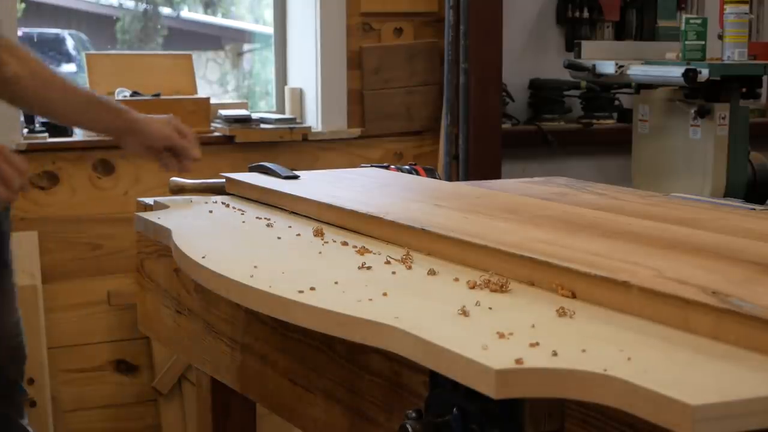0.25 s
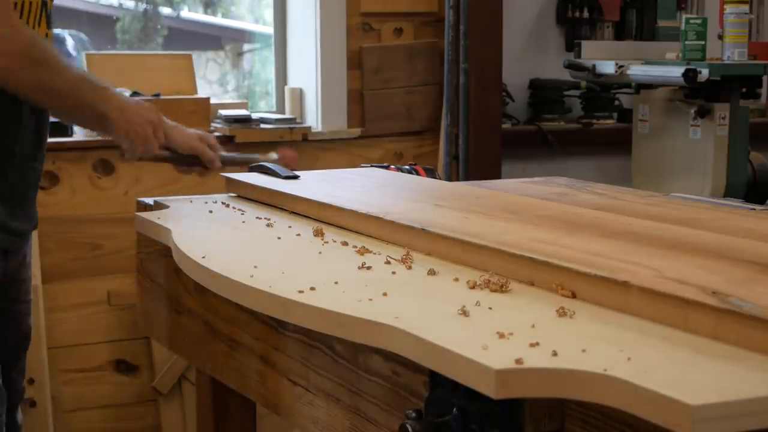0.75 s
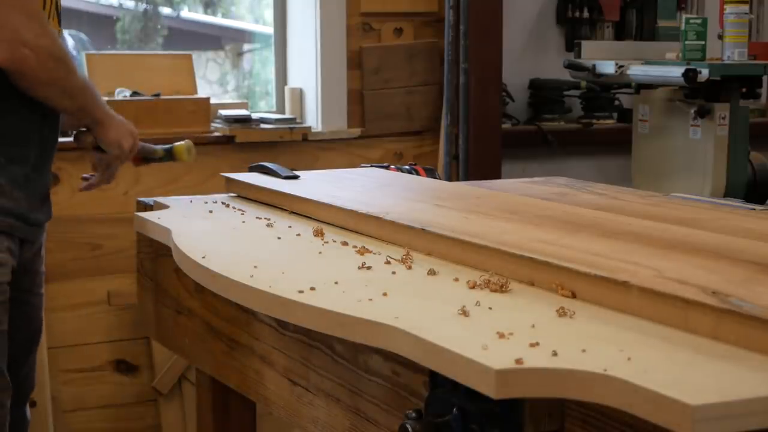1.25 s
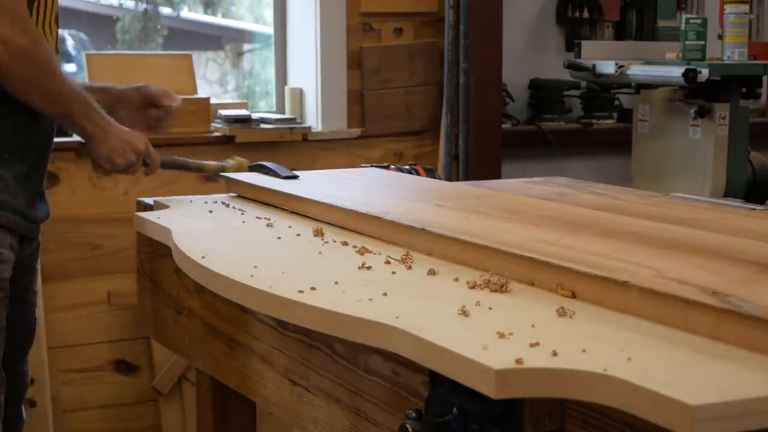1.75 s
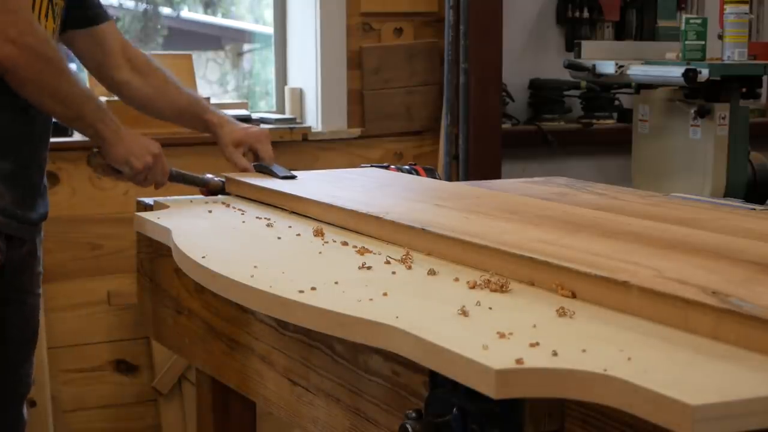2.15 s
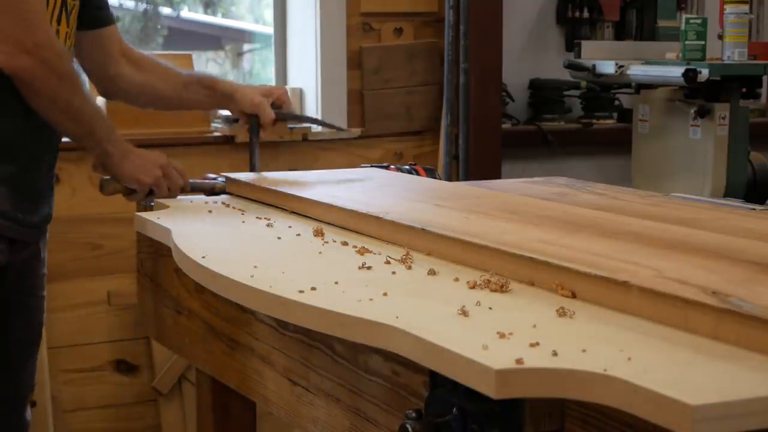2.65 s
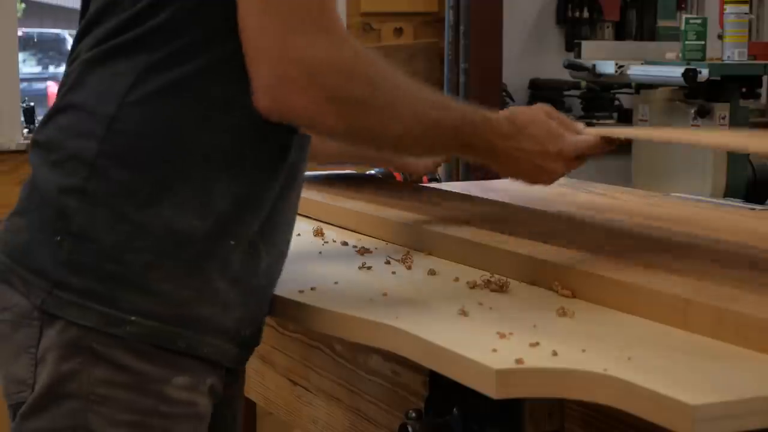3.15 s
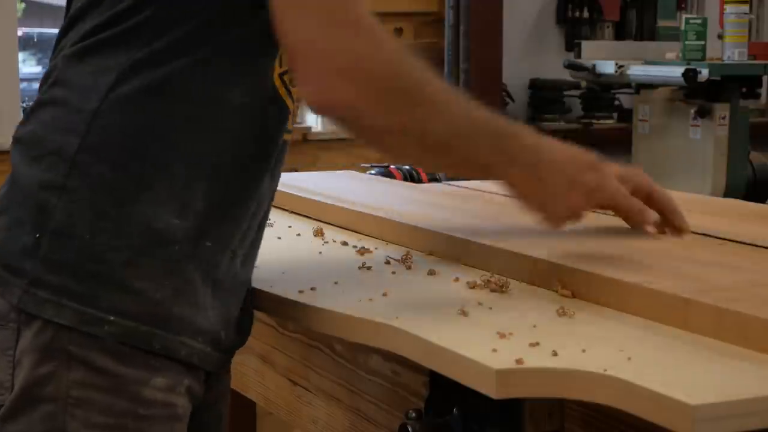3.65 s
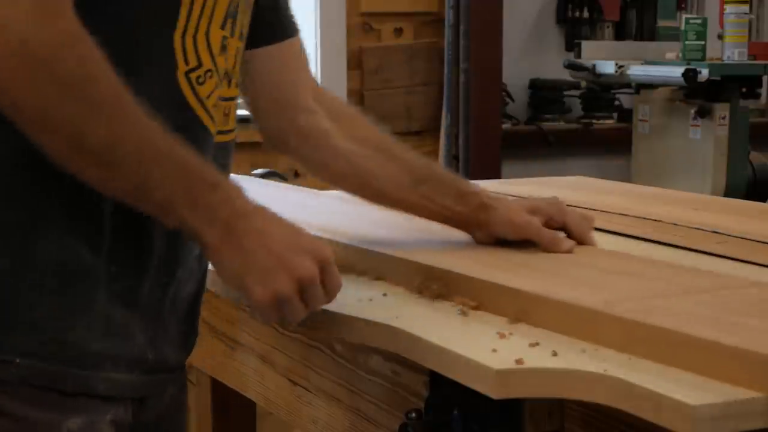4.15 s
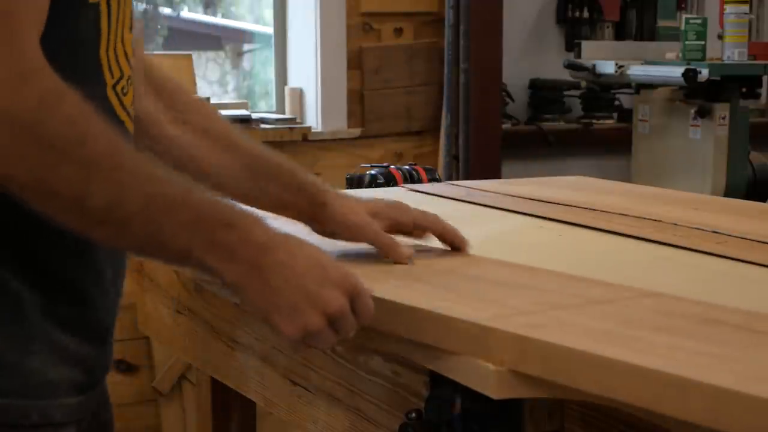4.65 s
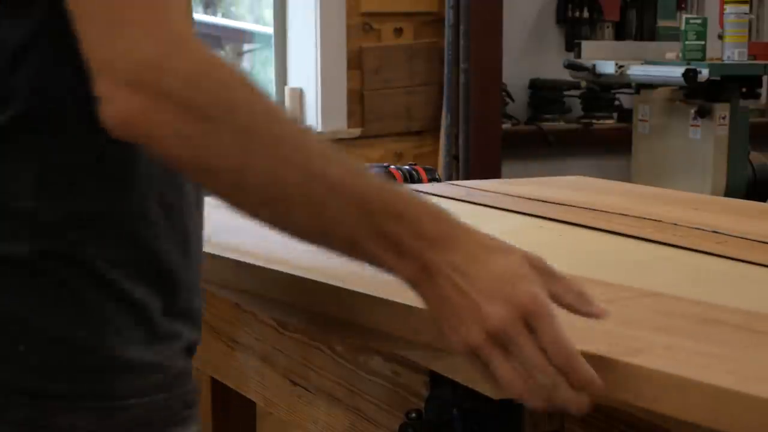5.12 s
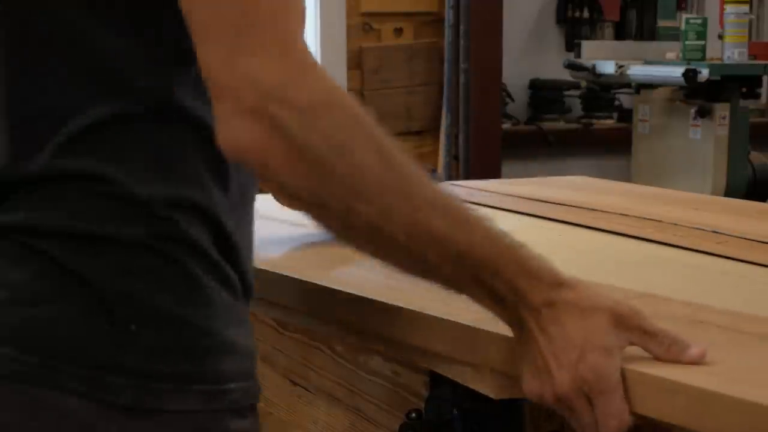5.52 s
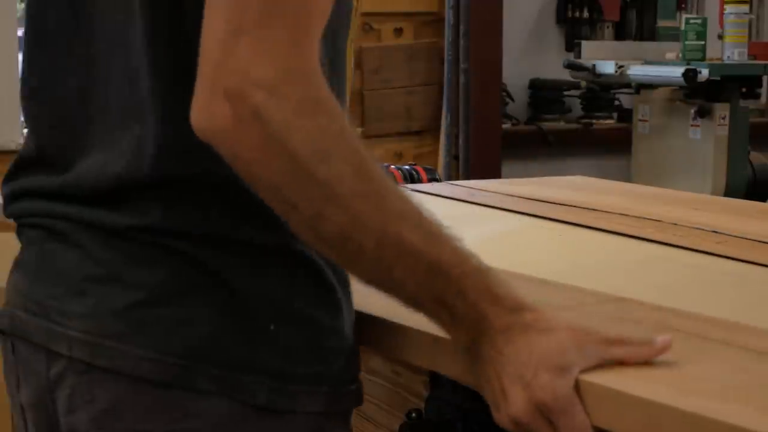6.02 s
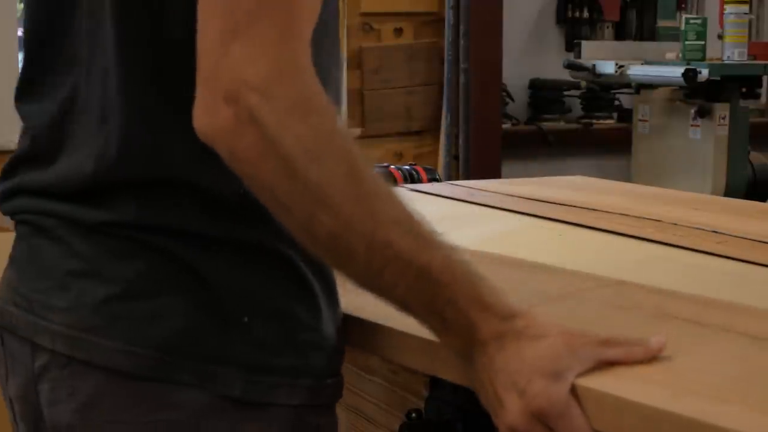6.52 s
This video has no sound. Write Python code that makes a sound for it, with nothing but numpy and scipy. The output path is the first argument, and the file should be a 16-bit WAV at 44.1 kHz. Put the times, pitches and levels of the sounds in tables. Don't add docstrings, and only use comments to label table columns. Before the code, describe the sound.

Close microphone at a wooden bench in a small dry-sounding shop with low air noise. Light cloth and hand movement comes first, then two hard mallet blows crack against a steel clamp and wood. Lower thuds follow, with quiet clamp handling. A strip lands in a sharp rattling double clatter, a plank grinds softly over the bench, and hands rub and crush crisp shavings before things fall nearly silent with faint ticks.

```python
import sys
import numpy as np
from scipy import signal
from scipy.fft import rfft, irfft
from scipy.io import wavfile
from scipy.ndimage import uniform_filter1d

SR = 44100
rng = np.random.default_rng(int(sys.argv[2]) if len(sys.argv) > 2 else 0)


def field_ratio(decibels):
    return 10 ** (np.asarray(decibels, dtype=float) / 20)


def transcribe(u):
    v = np.clip(np.atleast_2d(u).T, -1, 1)
    q = np.round(v * 32767).astype(np.int16)
    wavfile.write(sys.argv[1], SR, q)


N = 299030

# (f/Hz, level/dB, time to fall 60 dB/s)
BENCH = [(172.7, -10, 0.37), (281.7, 1.5, 0.13), (434, -2, 0.16), (549.5, -2.5, 0.15), (720, -1, 0.2),
         (907, -6.5, 0.17), (964, -8.5, 0.063), (1095, -16, .2), (1226, -16, 0.52), (1397, -15, .15),
         (1530, -22, 0.29), (1927, -21, 0.051), (2190, -16.5, .12), (2560, -21, 0.13)]
# (f/Hz, level/dB)
SCRAPE = [(1060, -23.5), (1800, -9), (2130, -4.5), (2310, -2), (2670, 4), (3290, -6.5), (4200, -16),
          (5460, -40.5), (9240, -120)]
# (f/Hz, level/dB)
DRAG = [(410, -35), (700, -6.5), (898, -2.5), (970, -2.5), (1360, -3), (1490, -1.5), (1650, -3.5),
        (2200, -2.5), (2860, -16.5), (4840, -120)]
# (f/Hz, level/dB)
SHAVINGS = [(1940, -28.5), (3300, 1), (4120, 3), (5490, 3), (6650, -0.5), (8250, -1.5), (10500, -7.5),
            (11000, -7), (14300, -41), (22000, -120)]


def evened(x):
    return x / np.sqrt(np.mean(x ** 2) + 1e-20)


def read(points, hz):
    f, value = np.transpose(points)
    return np.interp(np.log(hz + 1), np.log(f + 1), value)


def add(mix, s, sound):
    part = mix[round(s * SR):][:len(sound)]
    part += sound[:len(part)]


def add_all(mix, table, source):
    for s, *row in table:
        add(mix, s, source(*row))


def sine(hz, t):
    return np.sin(2 * np.pi * hz * t)


def coloured(x, points):
    gain = field_ratio(read(points, np.fft.rfftfreq(len(x), 1 / SR)))
    return evened(irfft(rfft(x) * gain, len(x)))


def noise(points, size):
    return coloured(rng.standard_normal(size), points)


def wobble(width):
    x = uniform_filter1d(rng.standard_normal(N), size=width)
    return evened(uniform_filter1d(x, size=width))


def hump(hz, octaves, skirt_db):
    return [(hz * 2. ** (k * octaves), skirt_db * k ** 2) for k in range(-3, 4)]


def dying(points, t60s, seconds):
    size = int(seconds * SR)
    hz, t, z = signal.stft(noise(points, size), SR, nperseg=512)
    fall = field_ratio(-60 * t / read(t60s, hz)[:, None])
    return signal.istft(z * fall, SR, nperseg=512)[1][:size]


def falling(t60, tail_db, tail_t60):
    t = np.arange(int(.5 * SR)) / SR
    return t, field_ratio(-60 * t / t60) + field_ratio(tail_db - 60 * t / tail_t60)


def thump_of_blow(t):
    first_hz, last_hz, glide_s, top_s = 832, 370, .005, .0064
    hz = last_hz + (first_hz - last_hz) * np.exp(-(t / glide_s) ** 2)
    turns = np.cumsum(hz) / SR
    swell = .45 * np.minimum(t / .003, 1) * np.exp(-(t / .0115) ** 4)
    swell += .75 * np.exp(-((t - top_s) / .0016) ** 2)
    return -swell * np.cos(2 * np.pi * turns)


def crack_of_blow(t, crack_s):
    u = np.maximum(t - crack_s, 0)
    crack = sum(gain * sine(hz, u) for gain, hz in
                [(0.24, 3800), (0.44, 5900), (1, 4900), (0.27, 6700), (0.59, 2900)])
    crack = crack * np.exp(-u / 0.00037) * (1 - np.exp(-u / .00008))
    snap = 0.09 * np.exp(-u / 0.00012) * sine(11000, u)
    slap = .9 * sine(1480, t) + 1.5 * sine(1100, t) + 0.39 * sine(3700, t)
    slap = slap * (t / 0.0038) ** 2 * np.exp(-2 * t / 0.0027)
    chirp_turns = 3200 * u - 220000 * u ** 2
    chirp = 0.23 * u / 0.00098 * np.exp(1 - u / .0009) * sine(1, chirp_turns)
    crack = signal.lfilter(*signal.butter(6, 7800, fs=SR), crack)
    return crack + 1.1 * np.roll(slap, 55) + field_ratio(-3) * chirp + snap


def steel_of_blow(k, t):
    steel_hz = [5257, 7413, 8850, 9652, 10630, 11100, 12118, 12620, 13214, 14260]
    # (level at first blow/dB, level at second blow/dB, time to fall 60 dB/s)
    steel_rows = [(-50, -50, .3), (-43, -49, .5), (-58, -60, .2), (-62, -58, .5), (-60, -59, .3),
                  (-60, -60, .2), (-62, -60, .2), (-64, -60, .35), (-63, -62, .2), (-66, -61, .3)]
    return sum(field_ratio(row[k] - 60 * t / row[2]) * sine(hz, t) for hz, row in zip(steel_hz, steel_rows))


def tail_of_blow(k, t):
    # (f/Hz, level/dB)
    tail_colours = [
        [(35, -37.5), (60, -18.5), (148, -13.5), (240, -5.5), (539, -14.5), (727, -2), (816, -9.5),
         (1080, -6.5), (1670, -14), (2360, -19), (2590, -12.5), (3340, -25.5), (7600, -24.5), (8300, -39.5),
         (15000, -53)],
        [(35, -52.5), (60, -16.5), (151, -17), (257, -4.5), (364, -10.5), (648, -13.5), (727, -0.5),
         (816, -15.5), (1050, -8.5), (1790, -21), (2840, -22.5), (3580, -33), (7500, -36.5), (8300, -48.5),
         (15000, -67)],
    ]
    # (f/Hz, time to fall 60 dB/s)
    shop_t60 = [(60, 0.94), (250, 0.78), (600, 0.44), (1500, 0.36), (4000, 0.72), (8000, 0.58),
                (15000, 0.93)]
    early_t60 = [(60, 0.13), (500, 0.11), (3000, 0.076), (15000, 0.026)]
    bench = sum(field_ratio(db - 60 * t / t60) * sine(1, hz * t + rng.random()) for hz, db, t60 in BENCH)
    early = dying(tail_colours[k], early_t60, .8)
    return dying(tail_colours[k], shop_t60, .8) + field_ratio(10) * early + field_ratio(1) * bench


def blow(k, crack_s, thump_db, crack_db, tail_db):
    t = np.arange(int(.8 * SR)) / SR
    rise = 1 - np.exp(-(t / .007) ** 2)
    ringing = field_ratio(tail_db) * tail_of_blow(k, t) + steel_of_blow(k, t)
    return field_ratio(thump_db) * thump_of_blow(t) + field_ratio(crack_db) * crack_of_blow(t, crack_s) + rise * ringing


def add_blows(mix):
    # (t/s of the blow, t/s until the steel cracks)
    blow_times = [
        (1.4813, .0030),
        (1.8289, .0030),
    ]
    # (thump level/dB, crack level/dB, tail level/dB)
    blow_levels = [
        (-4, 0.5, -24.5),
        (-4, 0, -22),
    ]
    for k, (s, crack_s) in enumerate(blow_times):
        add(mix, s, blow(k, crack_s, *blow_levels[k]))


def thud(peak_db, body_hz, click_db, t60, rise_s=0.0012):
    t, fall = falling(t60, -16.5, 0.39)
    near = hump(body_hz, .75, -7)
    wood = sum(field_ratio(db + read(near, hz)) * sine(hz, t) for hz, db, _ in BENCH)
    wood = evened(evened(wood) + .7 * noise(near, len(t)))
    click = noise(DRAG, len(t)) + noise(SCRAPE, len(t))
    return field_ratio(peak_db - 8) * fall * (1 - np.exp(-t / rise_s)) * (wood + field_ratio(click_db) * click)


def bump(peak_db, body_hz, t60):
    return thud(peak_db, body_hz, -58, t60, rise_s=0.0062)


def rock(peak_db):
    return thud(peak_db, body_hz=550, click_db=-11, t60=0.1, rise_s=0.0028)


def add_thuds(mix):
    # (t/s, peak level/dB, body f/Hz, click against body level/dB, time to fall 60 dB/s)
    thud_rows = [(0.588, -42, 649, -7.5, 0.046), (0.622, -38, 358, -37, 0.11),
                 (1.914, -20.5, 397, -16, 0.24), (2.072, -15, 320, -26, 0.12),
                 (2.104, -20, 536, -24.5, 0.085), (2.703, -33, 360, -39, 0.086),
                 (2.63, -37, 450, -25, 0.025), (2.827, -52, 450, 4.5, 0.05),
                 (3.654, -22.5, 490, -1.5, 0.081), (3.972, -36, 315, -5.5, 0.24),
                 (4.471, -31, 600, -26, 0.16), (4.5, -34, 400, -16, 0.11), (.645, -36.5, 500, -26, 0.05),
                 (5.22, -65, 313, -3, 0.08)]
    # (t/s, peak level/dB)
    rock_rows = [
        (2.263, -42.5),
        (2.377, -43),
        (2.488, -43.5),
        (2.599, -43.5),
    ]
    # (t/s, peak level/dB, body f/Hz, time to fall 60 dB/s)
    bump_rows = [(.62, -31, 222, 0.12), (2.128, -27, 203, 0.13), (3.661, -36, 100, 0.11),
                 (3.965, -40.5, 102, .3), (5.46, -56, 90, 0.36), (5.779, -52, 131, 0.32)]
    add_all(mix, thud_rows, thud)
    add_all(mix, rock_rows, rock)
    add_all(mix, bump_rows, bump)


def tick(peak_db, click_db, rattle_db, rattle_hz):
    t, fall = falling(0.0033 + 2.6e-6 * rattle_hz, -15.5, 0.35)
    size = len(t)
    click = 0.68 * noise(DRAG, size) + noise(SCRAPE, size) + 0.32 * noise(SHAVINGS, size)
    rattle = 1.2 * np.exp(-t / .006) * noise(hump(rattle_hz, 0.12, -9.5), size)
    rattle += .6 * noise(hump(rattle_hz, .6, -6.5), size)
    both = field_ratio(click_db) * click + field_ratio(rattle_db) * rattle
    return field_ratio(peak_db + 2) * fall * (1 - np.exp(-t / 0.00069)) * both


def add_ticks(mix):
    # (t/s, peak level/dB, click against peak level/dB, rattle against peak level/dB, rattle f/Hz)
    tick_rows = [(2.9535, -37, -4.5, -28, 5260), (3.1074, -39.5, -5.5, -36, 5500),
                 (3.1384, -42, -28, -12.5, 11390), (3.5164, -21, -15, -9, 11600),
                 (3.5298, -17.5, -18.5, -7.5, 11480), (3.5452, -23, -15, -7, 11210),
                 (3.6500, -18.5, -13, -15.5, 12900), (3.6647, -13, -20, -13, 10160),
                 (4.6698, -44, -18, -15, 10750), (4.7565, -40, -6.5, -12, 5100),
                 (4.8414, -40, -20.5, -1, 9000), (5.3005, -22, -25, -8, 6700),
                 (5.3614, -37, -12, -16, 5320), (5.3933, -38.5, -16, -8.5, 7370),
                 (6.565, -46.5, -20, -30, 5270), (6.7124, -45.5, -9.5, -31, 5240)]
    add_all(mix, tick_rows, tick)


def ring(modes, peak_db, held_s):
    t = np.arange(int(.3 * SR)) / SR
    tone = sum(field_ratio(db - 60 * t / np.clip(t60, .03, .6)) * sine(hz, t) for hz, db, t60 in modes)
    return field_ratio(peak_db - 600 * np.maximum(t - held_s, 0)) * tone * (1 - np.exp(-t / 0.0013))


def add_rings(mix):
    # (f/Hz, level/dB, time to fall 60 dB/s)
    clamp_tones = [(448, 0, 0.22), (754, 0.5, 0.22), (937, -4.5, 0.5), (2503, -6, 4.6), (3079, -24, 0.47),
                   (3941, -30, 1.7)]
    hole_tones = [(308, -6, 1.3), (468, -1, 0.11)]
    squeak_tones = [(4250, -3, .3)]
    # (t/s, peak level/dB, t/s until a hand stops it)
    ring_rows = [
        (2.8285, -52.5, 0.076),
        (2.703, -41, 0.032),
        (2.655, -70, .07),
    ]
    for modes, (s, *row) in zip([clamp_tones, hole_tones, squeak_tones], ring_rows):
        add(mix, s, ring(modes, *row))


def grit(per_s, spread_db, share):
    snap_db = spread_db * np.minimum(rng.exponential(1, N), 4)
    snaps = (rng.random(N) < per_s / SR) * field_ratio(snap_db) * rng.standard_normal(N)
    flutter_db = .7 * wobble(500) + 1.5 * wobble(90)
    return (rng.standard_normal(N) + share * evened(snaps)) * field_ratio(flutter_db)


def strokes(table, offset_db=0, slope=0):
    t = np.arange(0, N + 64, 64) / SR
    power = 0
    for top, rise, fall, db, colour_db in table:
        away = np.where(t < top, (top - t) / rise, (t - top) / fall)
        power = power + field_ratio(db + offset_db + slope * colour_db - 20 * away ** 1.5) ** 2
    return np.interp(np.arange(N) / SR, t, power)


def pull(offset_db=0, weight=0, caught=0):
    # (t/s, pressure level/dB, weight on the bench level/dB, shavings caught level/dB)
    pull_rows = [(3.86, -66, -1, 1), (3.97, -48.5, 7, -2), (4.12, -40.5, -1, -1), (4.3, -41.5, -4.5, 2.5),
                 (4.45, -45, -4.5, -5.5), (4.5, -41.5, 0, -8.5), (4.57, -46.5, 5, -8.5),
                 (4.69, -58, 2, 5.5), (4.76, -65, -1, 0)]
    s, pressure_db, weight_db, caught_db = np.transpose(pull_rows)
    db = pressure_db + offset_db + weight * weight_db + caught * caught_db
    return field_ratio(np.interp(np.arange(N) / SR, s, db, -200, -200)) ** 2


def dragging():
    # (top t/s, rise t/s, fall t/s, drag level/dB, drone against drag level/dB)
    grind_rows = [(.596, 0.034, 0.05, -59.5, 11.5), (.635, 0.065, 0.13, -70.5, 23),
                  (2.508, 0.1, 0.19, -63, 4), (2.718, 0.027, 0.13, -66.5, 15),
                  (2.835, 0.012, 0.2, -60.5, 6.5), (2.975, 0.056, 0.076, -53.5, -6),
                  (3.111, 0.0081, 0.1, -57.5, 0.5), (3.315, 0.016, 0.049, -70, 5),
                  (3.42, 0.13, 0.081, -69.5, -17), (3.55, 0.029, 0.026, -39.5, -11.5),
                  (3.63, 0.086, 0.028, -50, -2), (3.69, .05, 0.17, -47.5, -1.5),
                  (4.86, 0.19, 0.035, -59, -3.5), (4.98, .07, 0.046, -72.5, -8),
                  (5.226, 0.025, 0.069, -59.5, 1), (5.33, 0.3, 0.27, -59.5, -8),
                  (5.56, .035, .08, -53, -11), (5.63, 0.097, 0.18, -46.5, -10.5),
                  (5.73, 0.1, 0.054, -53.5, -9), (5.8, 0.084, 0.35, -69.5, 5),
                  (6.57, 0.026, 0.092, -55, -8), (6.71, 0.017, 0.071, -56, -14), (6.78, 0.044, .1, -62, 9)]
    # (f/Hz, level/dB)
    drone_colour = [(53, -41), (90, -2.5), (125, -4.5), (334, 2), (416, -3.5), (467, 0.5), (567, -5),
                    (642, -2.5), (900, -16.5), (1170, -16.5), (1980, -120)]
    drag = pull() + strokes(grind_rows)
    drone = pull(-4.5, weight=0.72) + strokes(grind_rows, slope=0.96)
    grinding = np.sqrt(drag) * coloured(grit(900, 4.4, 0.56), DRAG)
    return grinding + np.sqrt(drone) * coloured(grit(300, 5.6, 0.34), drone_colour)


def rubbing():
    # (top t/s, rise t/s, fall t/s, rub level/dB, brightness level/dB)
    swish_rows = [(.055, 0.071, 0.18, -54.5, 3.5), (.18, 0.034, 0.12, -56, 4.5),
                  (.25, 0.042, .08, -55.5, 3), (.286, 0.067, 0.063, -47, -3.5),
                  (.35, 0.073, 0.22, -55.5, -3.5), (.52, 0.052, 0.26, -61, 5), (.77, 0.22, 0.17, -53, 0),
                  (.86, .08, .05, -60.5, -0.5), (1.0, 0.074, 0.18, -75.5, 4), (1.24, 0.2, .2, -65, 0.5),
                  (3.4, 0.075, 0.083, -65, 2), (5.08, 0.71, 0.16, -71, 2), (5.84, 0.19, 0.097, -77.5, 7),
                  (6.354, 0.07, .1, -70, -5)]
    grip_rows = [(2.504, 0.1, 0.153, -68, 2), (2.606, .06, 0.14, -73.5, 0.5), (2.744, 0.027, 0.066, -73, 4),
                 (2.83, 0.047, 0.32, -63.5, -0.5), (2.965, 0.025, 0.15, -49, -5.5),
                 (3.147, 0.043, 0.13, -59, -3.5), (3.55, 0.019, 0.23, -42, 7),
                 (3.68, 0.083, 0.16, -42.5, 7), (3.86, 0.25, .12, -48, 3), (4.75, 0.028, 0.21, -50.5, -5),
                 (4.81, 0.092, 0.092, -52.5, 0.5), (4.85, 0.098, 0.061, -57, 8.5),
                 (6.574, 0.051, 0.12, -61, -6.5), (6.71, 0.049, 0.13, -69, 4.5)]
    sweep_rows = [(5.185, 0.043, 0.11, -54, -6), (5.265, 0.097, 0.14, -45.5, -0.5),
                  (5.225, 0.041, .06, -54.5, 4.5), (5.31, 0.09, 0.056, -48, 7),
                  (5.36, 0.037, 0.045, -45, 6), (5.405, 0.082, 0.13, -40.5, -8), (5.46, .05, .07, -56, -13),
                  (5.64, 0.12, 0.1, -47, -18), (5.715, 0.1, 0.12, -49.5, -17)]
    # (f/Hz, level/dB)
    skin_colour = [(5000, -32.5), (8500, -5.5), (10500, -4), (14500, -8.5), (15300, -15.5), (15800, -23.5),
                   (16200, -25.5)]
    # shavings/dB, skin/dB, skin change per dB of brightness
    kinds = [(swish_rows, -2.5, -10, 2.3), (grip_rows, -5.5, -11.5, 1.4), (sweep_rows, 2, -19, 1.6)]
    rub, shavings, skin = pull(-1.5), pull(-9.5, caught=0.88), pull(-19, caught=2)
    for rows, shavings_db, skin_db, skin_slope in kinds:
        rub += strokes(rows)
        shavings += strokes(rows, shavings_db, 0.99)
        skin += strokes(rows, skin_db, skin_slope)
    sound = np.sqrt(rub) * coloured(grit(1500, 3, .5), SCRAPE)
    sound += np.sqrt(shavings) * coloured(grit(1600, 4.8, 0.23), SHAVINGS)
    return sound + np.sqrt(skin) * coloured(grit(2500, 1.9, 0.32), skin_colour)


def speck(peak_db, hz=6060):
    t = np.arange(300) / SR
    fizz = noise(hump(hz, 1.1, -6), len(t))
    snap = np.exp(-t / .0001) * sine(hz, t)
    return field_ratio(peak_db) * (snap + 0.082 * np.exp(-t / .001) * fizz)


def fleck(peak_db):
    return speck(peak_db, 10300)


def crackle(peak_db):
    return speck(peak_db, 6500)


def add_shavings(mix):
    # (t/s, peak level/dB)
    speck_rows = [(1.1318, -45), (2.2538, -41), (2.5664, -43.5), (2.744, -43), (3.1078, -51),
                  (3.5174, -19.5), (3.6504, -13), (6.694, -45), (5.9602, -41.5), (6.1885, -41),
                  (6.352, -52)]
    fleck_rows = [(5.033, -44), (5.048, -45), (5.081, -53), (5.1018, -41), (5.106, -43), (5.117, -49),
                  (5.757, -47), (5.804, -43)]
    crackle_rows = [(5.1648, -45), (5.1803, -42), (5.207, -37), (5.2235, -34), (5.229, -31), (5.239, -33),
                    (5.271, -33), (5.285, -33), (5.3005, -29), (5.3028, -27), (5.352, -23), (5.357, -31),
                    (5.3625, -32), (5.394, -35), (3.6305, -32), (3.6525, -19)]
    add_all(mix, speck_rows, speck)
    add_all(mix, fleck_rows, fleck)
    add_all(mix, crackle_rows, crackle)


def echoes(x):
    taps = np.zeros(2600)
    taps[rng.integers(60, 2600, 40)] = rng.choice([-1., 1.], 40)
    taps = taps * field_ratio(-60 * np.arange(2600) / SR / 0.082)
    copies = signal.oaconvolve(x, taps / np.linalg.norm(taps))[:N]
    return (x + field_ratio(-10) * copies) * field_ratio(-1.76)


def air():
    # (f/Hz, level/dB)
    air_colour = [(12, -48), (20, -15.5), (124, 2.5), (321, -6.5), (391, -3.5), (489, -7.5), (648, -7.5),
                  (788, -9.5), (1550, -16.5), (2160, -18), (2710, -13.5), (3790, -25.5), (11600, -31.5),
                  (14600, -30.5), (16300, -57)]
    return field_ratio(-64 + 1.1 * wobble(6000)) * noise(air_colour, N)


def scene():
    mid = echoes(rubbing() + dragging())
    add_blows(mid)
    add_thuds(mid)
    add_ticks(mid)
    add_rings(mid)
    add_shavings(mid)
    mid = signal.lfilter(*signal.butter(2, 95, "high", fs=SR), mid) + air()
    return np.array([mid, mid])


def band_limit(x):
    return signal.sosfilt(signal.butter(12, 16970, fs=SR, output="sos"), x)


def record(dry):
    # (f/Hz, side minus mid level/dB)
    quiet_side = [(60, -28), (110, -22.5), (200, -25.5), (380, -23), (700, -20), (1290, -18.5),
                  (2380, -24.5), (4400, -11.5), (8120, -6), (15000, -9)]
    loud_side = [(60, -19), (110, -21.5), (200, -30.5), (380, -37), (700, -35.5), (1290, -26.5),
                 (2380, -23.5), (4400, -28.5), (8120, -32), (15000, -31)]
    hz, t, z = signal.stft(dry[0], SR, nperseg=2048)
    size = np.abs(z) * field_ratio(read(quiet_side, hz))[:, None]
    crowded = uniform_filter1d(size, size=20, axis=0) / field_ratio(-100.5)
    draw = 0.7 * rng.random((52, len(t))).repeat(20, axis=0)[:len(hz)] + 0.64 * rng.random(len(t))
    kept = draw < .95 / (1 + crowded) ** .35
    patchy = size * kept * np.exp(2j * np.pi * rng.random(z.shape))
    steady = 1j * z * field_ratio(read(loud_side, hz))[:, None] * crowded / (crowded + 40)
    side = signal.istft(steady + patchy, SR, nperseg=2048)[1][:N]
    edge = signal.firwin(301, 16450, window=("kaiser", 8), fs=SR)[None]
    pair = np.clip(dry + np.array([side, -side]), -1, 1)
    return band_limit(signal.oaconvolve(pair, edge, "same"))


dry = scene()
out = record(dry)
transcribe(out)
```